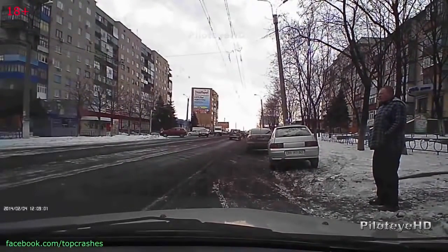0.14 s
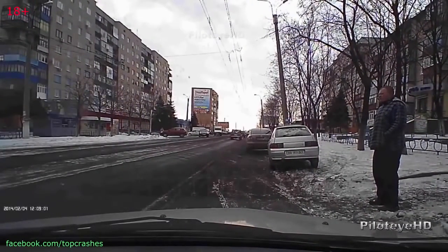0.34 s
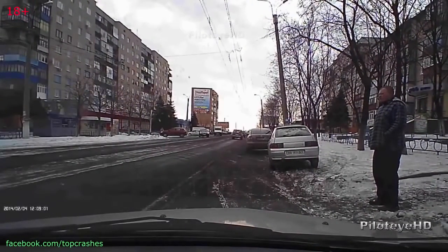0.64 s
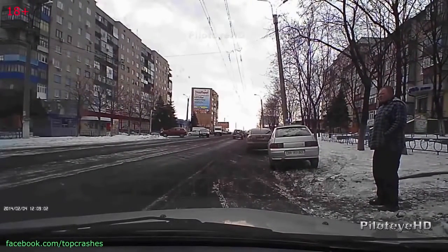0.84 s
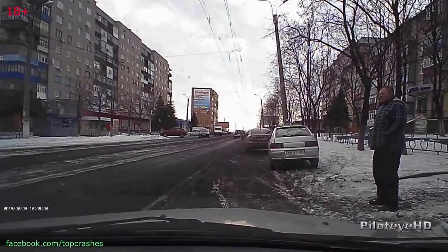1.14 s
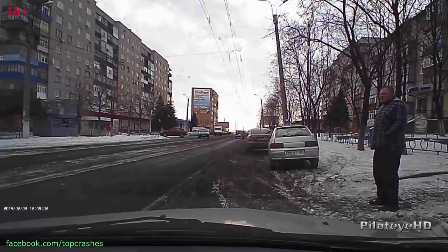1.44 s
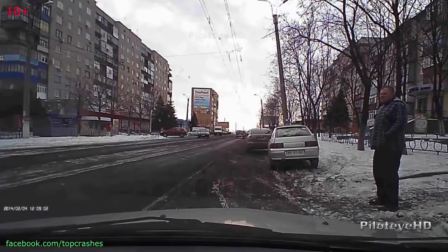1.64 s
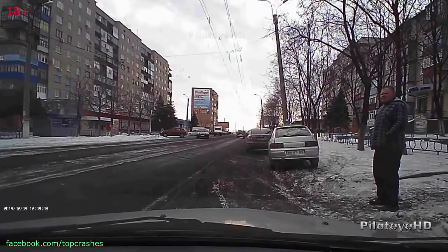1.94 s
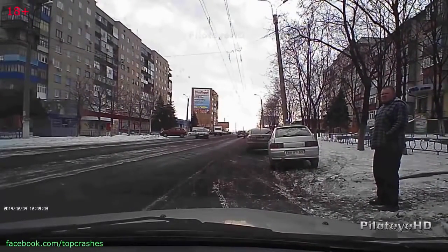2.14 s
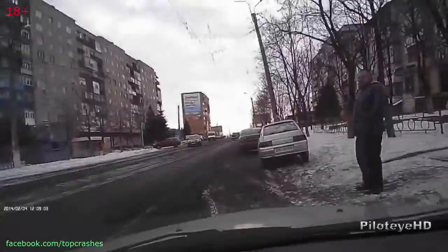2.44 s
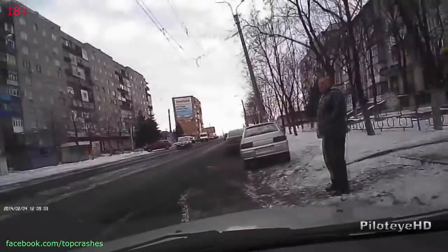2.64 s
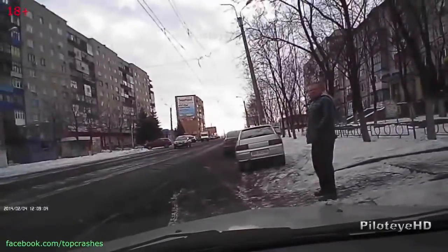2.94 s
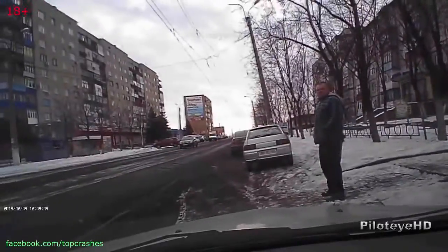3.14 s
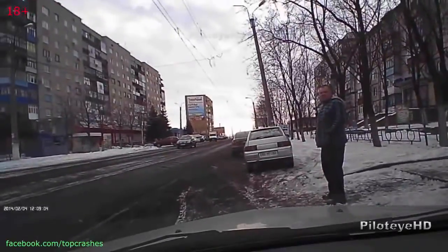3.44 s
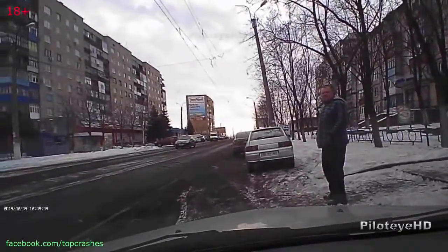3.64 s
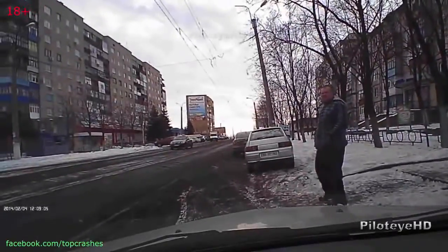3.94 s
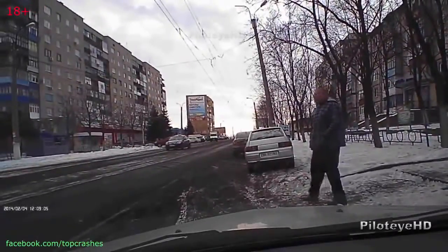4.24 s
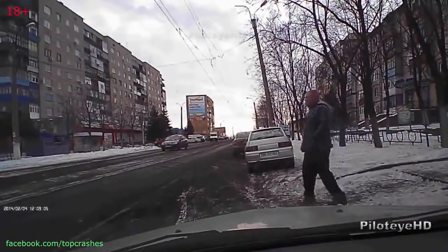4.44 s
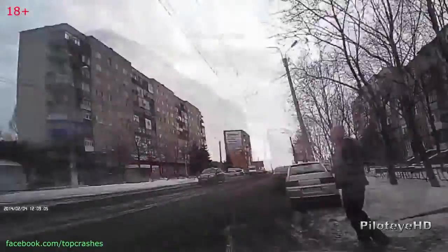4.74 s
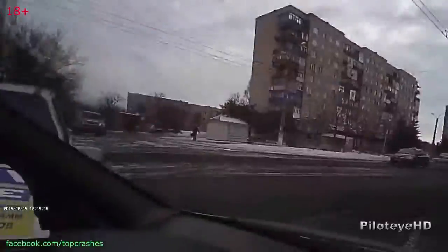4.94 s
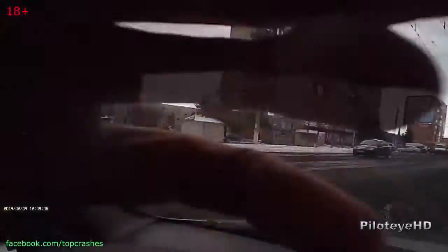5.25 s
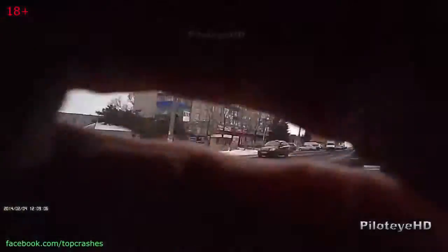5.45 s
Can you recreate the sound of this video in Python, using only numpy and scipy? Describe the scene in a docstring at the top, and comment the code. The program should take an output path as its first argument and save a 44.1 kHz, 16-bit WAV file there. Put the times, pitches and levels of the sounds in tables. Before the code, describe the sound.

The quiet, steady air of a car heater is broken by a heavy, distorted crunch as the car is hit. Sheet metal rips and crumples, and objects tumble against the floor and panels of the padded cabin, with gritty crackle and a fading rumble. The fan carries on underneath. Then comes close handling noise right on the camera microphone: a flurry of dry plastic snaps, followed by scraping fingers and a few last clicks.

```python
"""A heater fan rushes in a parked car, then a crash from behind overloads a small windscreen camera's mic.
Bumpers thump, sheet metal tears and crumples in bursts of tiny impacts, and the idling engine dies.
The body rocks on its springs while loose things tumble and knock, ringing the floor and panels.
Then a hand takes hold of the camera: its plastic mount slips and clicks, fingers rub and creak the case."""
import sys
import numpy as np
from scipy import signal
from scipy.io import wavfile
from scipy.ndimage import uniform_filter1d

SR = 44100
rng = np.random.default_rng(int(sys.argv[2]) if len(sys.argv) > 2 else 0)


def bounce(signal):
    """Save signal as a 16-bit WAV file at the path given by the first command-line argument."""
    frames = np.transpose(np.atleast_2d(signal))
    limited = np.clip(frames, -1, 1)
    pcm = np.round(limited * 32767).astype(np.int16)
    wavfile.write(sys.argv[1], SR, pcm)


N = 246519

# spectrum of scattering grit and splinters: f/Hz, relative level/dB
GRIT_SPECTRUM = [(1180, -9), (2000, -0.5), (2690, -2), (3120, -12), (3710, -6.5), (4610, -20), (7060, -20),
                 (8550, -31), (14800, -37.5), (16000, -53.5)]


def amp(db):
    return 10 ** (np.asarray(db) / 20)


def unit_rms(x):
    return x / np.sqrt(np.mean(x ** 2) + 1e-20)


def spectrum_db(points, hz):
    f, db = np.transpose(points)
    return np.interp(np.log(hz + 1), np.log(f + 1), db)


def add(mix, s, sound):
    part = mix[round(s * SR):][:len(sound)]
    part += sound[:len(part)]


def fader(rows, offset_db=0, depth=1):
    """Gain over time from a dB curve scaled by depth, silent outside the curve."""
    s, db = np.transpose(rows)
    return amp(np.interp(np.arange(N) / SR, s, offset_db + depth * db, left=-200, right=-200))


def swell(s, hold, db, rise, fall):
    """Gain that climbs 30 dB in rise seconds up to s, holds, and sinks 30 dB every fall seconds."""
    t = np.arange(N) / SR - s
    return amp(db + 30 * np.minimum(np.minimum(t / rise, 0), (hold - t) / fall)) * (t > -rise)


def colour(x, points):
    """Minimum-phase EQ of unit energy through (f/Hz, relative level/dB) points."""
    log_gain = spectrum_db(points, abs(np.fft.fftfreq(8192, 1 / SR))) * np.log(10) / 20
    taps = np.fft.ifft(np.exp(np.conj(signal.hilbert(log_gain)))).real[:4096]
    return signal.oaconvolve(x, taps / np.linalg.norm(taps))[:N]


def grains(per_s, spread_db):
    """A crackle of random tiny impacts at unit power; a few are large."""
    size = amp(spread_db * np.minimum(rng.exponential(1, N), 5)) * rng.standard_normal(N)
    return unit_rms(size * (rng.random(N) < per_s / SR))


def ring(modes, scatter, rise, pitch=1, decay=1):
    """A struck object, peak 1: scatter varies each mode's level and tuning; rise is the contact time/s."""
    hz, db, t60 = np.transpose(modes)[:, :, None]
    t = np.arange(6000) / SR
    scatter = scatter[:len(modes), None]
    envelopes = amp(db + 2.0 * scatter - 60 * t / (t60 * decay))
    tuned_hz = hz * pitch * (1 + 0.033 * scatter)
    sound = (envelopes * np.sin(2 * np.pi * tuned_hz * t)).sum(0)
    sound *= 1 - np.exp(-(t / rise) ** 2)
    return sound / abs(sound).max()


def cabin(x):
    """The padded cabin answers with a short, dull reverb."""
    t = np.arange(8000) / SR
    tail = rng.standard_normal(len(t)) * amp(-60 * t / 0.1) * (t > .002)
    tail = signal.lfilter([1], [1, -.6], tail)
    return signal.oaconvolve(x, tail / np.linalg.norm(tail))[:N]


def heater_fan():
    """A bed of air rushing through resonant ducts, its colour and level drifting slightly."""
    # spectrum of the airflow: f/Hz, relative level/dB
    air = [(12, -30), (22, -9), (40, -13), (120, -10), (160, -15), (215, -3), (900, -6), (1030, -16),
           (1620, -17), (1800, -23), (2800, -33), (4500, -44), (8500, -49), (12000, -51), (16000, -46)]
    # duct and cabin peaks and dips: f/Hz, width/Hz, gain/dB
    ducts = [(267, 6, -2), (363, 95, 7.5), (442, 400, -6.5), (570, 54, 4), (708, 60, -8), (762, 35, 6.5),
             (1234, 59, 1), (1473, 75, -0.5), (3730, 86, 6)]
    frames, hz = N // 512 + 5, np.fft.rfftfreq(2048, 1 / SR)
    real, imag, patches = rng.standard_normal((frames, 1025, 3)).T
    patches = unit_rms(uniform_filter1d(uniform_filter1d(patches, 12, 0), 6, 1))
    drift = unit_rms(uniform_filter1d(rng.standard_normal(frames), 8))
    ducts_db = sum(db / (1 + ((hz - f) / (width / 2)) ** 2) for f, width, db in ducts)
    rush_db = (spectrum_db(air, hz) + ducts_db)[:, None] + 1.4 * patches + .4 * drift
    _, rush = signal.istft((real + 1j * imag) * amp(rush_db), nperseg=2048, noverlap=1536)
    return amp(-43) * unit_rms(rush[:N])


def whine():
    """A thin steady whine; rapid polarity flips give it a comb of side tones."""
    whine_hz, flips_per_s = 7867.5, 59
    t = np.arange(N) / SR
    flip = np.tanh(8 * np.sin(np.pi * flips_per_s * t))  # nearly square, so the comb is wide
    return np.sqrt(2) * amp(-73.5) * flip * np.sin(2 * np.pi * whine_hz * t)


def engine():
    """The low firing tone of the idling engine, which dies in the blow."""
    firing_hz, stall_s = 28, 2.4
    t = np.arange(N) / SR
    return np.sqrt(2) * amp(-61) * np.sin(2 * np.pi * (firing_hz * t + rng.random())) * (t < stall_s)


def fingers():
    """Skin sticks and slips: dense tugs sound through the case; lighter slips hiss and ring its shell."""
    # finger strokes: t/s, hold/s, tug level/dB, rise/s, hiss level/dB
    strokes = [(4.649, 0.041, -33, .015, -47.5), (4.745, .003, -23, 0.038, -42.5),
               (4.886, 0.032, -48, 0.074, -71), (5.099, .004, -30.5, 0.05, -47.5),
               (5.281, 0.042, -39, 0.17, -54), (5.363, 0.033, -36, 0.028, -49.5),
               (5.428, 0.099, -49, .05, -64.5), (5.558, 0.055, -43.5, .1, -61)]
    # spectrum of rubbing through the case: f/Hz, relative level/dB
    rub = [(120, -24), (200, -4.5), (400, 0.5), (500, -5), (620, 2.5), (850, -2.5), (1100, 1), (1450, -5),
           (1800, -6), (2150, -8.5), (2550, -14), (3200, -36), (5000, -55)]
    # spectrum of skin hiss: f/Hz, relative level/dB
    skin = [(1650, -42), (2800, 4), (3260, -7.5), (4060, -2.5), (4600, -9), (6820, -7.5), (14200, -25),
            (16000, -40)]
    # shell modes under the fingers: f/Hz, relative level/dB, t60/s
    shell_modes = [(1260, 2, 0.025), (1850, 0, .025), (2080, 0, 0.024), (2600, -4, 0.017),
                   (3745, -10.5, 0.028), (6800, -11, 0.013)]
    fall_s = 0.056
    tug = sum(swell(s, hold, db, rise, fall_s) for s, hold, db, rise, _ in strokes)
    hiss = sum(swell(s, hold, db, rise, fall_s) for s, hold, _, rise, db in strokes)
    shell = ring(shell_modes, np.zeros(len(shell_modes)), rise=0.00052)
    creak = amp(4.5) * signal.oaconvolve(hiss * grains(980, 3.5), shell / np.linalg.norm(shell))[:N]
    return colour(tug * grains(4000, 1.2), rub) + colour(hiss * grains(12000, 1.6), skin) + creak


def mount():
    """Each slip of the mount snaps dryly, rings the case and thuds; the grip jolts the glass."""
    # slips: t/s, case level/dB, snap level/dB, sizzle against the snap/dB, thud level/dB
    clicks = [(4.6028, -30.5, -43, -14, -30.5), (4.638, -29, -44, -10, -33.5), (4.65, -14, -29, -4.5, -44),
              (4.6569, -17.5, -28, -7, -38), (4.66, -13, -36, -10, -40), (4.666, -17.5, -42, -11, -33),
              (4.6793, -26, -47, -5, -30), (4.6853, -26, -19.5, -4.5, -35), (4.6936, -23.5, -32, -7, -30),
              (4.7093, -24, -37, 0, -44), (4.7227, -24, -30, -4, -48), (4.7395, -15.5, -21, -11, -44),
              (4.745, -19.5, -46, -5, -18), (4.7549, -24, -43, -11, -38), (4.7721, -10, -11, -8.5, -35),
              (4.7823, -40, -47, 6, -39), (4.7897, -23.5, -41, -6, -39), (4.8089, -32, -33, -8, -41),
              (4.8127, -34, -37, -2, -49), (4.8204, -41, -43, -2, -35), (4.8291, -19, -28.5, -5, -35),
              (4.8494, -32, -33, -2, -41), (4.8521, -26, -25.5, -12, -31), (4.8557, -20, -23.5, 1.5, -49),
              (4.8645, -23.5, -19, -8.5, -48), (4.8713, -24.5, -41, -2, -44),
              (4.8782, -18.5, -24.5, -13, -40), (4.8966, -32, -49, -2, -49), (4.9144, -28, -50, 3, -35),
              (4.9535, -25.5, -27.5, -21, -43), (5.0732, -27.5, -50, -6, -33), (5.0948, -35, -38, -5, -37),
              (5.0989, -16, -27, -5, -49), (5.102, -33, -26.5, -4.5, -27), (5.1047, -18.5, -19, -14, -25.5),
              (5.1227, -33, -57, -12, -35), (5.2458, -31, -50, -9, -33), (5.395, -28.5, -39, -7, -53),
              (5.452, -48, -38.5, 6.5, -57), (5.5407, -32.5, -34, -22, -51)]
    # case modes, before pitch and decay scale them: f/Hz, relative level/dB, t60/s
    case = [(1014, 0.5, 0.016), (1248, 9, 0.013), (1465, 4, 0.018), (1710, -11, 0.011), (2360, -5, 0.0065),
            (2630, 8, 0.0075)]
    # thud through the glass: multiple of its pitch, relative level/dB, t60/s
    thud = [(.5, -11, 0.031), (1.0, 17, 0.032)]
    # spectrum of the snap's mids: f/Hz, relative level/dB
    snap_mids = [(1200, -38), (1900, 10), (2700, -6.5), (3780, 5.5), (4600, -3), (6700, -5.5), (8500, -54)]
    # spectrum of the sizzle on top: f/Hz, relative level/dB
    snap_highs = [(5500, -23), (7000, 3), (9000, -0.5), (12000, -7), (16000, -5.5)]
    # modes of a small hard part of the mount: f/Hz, relative level/dB, t60/s
    ping_modes = [(3070, -3, 0.043), (3680, 12, 0.024), (3780, -7, 0.078), (3860, -16, .07),
                  (5100, -20, .04), (5100, -19, .04)]
    # strikes on that part: t/s, peak level/dB
    pings = [(5.074, -55), (5.0995, -45), (5.104, -22), (5.361, -58)]
    body, snaps, sizzle = np.zeros((3, N))
    t = np.arange(400) / SR
    for s, case_db, snap_db, sizzle_db, thud_db in clicks:
        noise = rng.standard_normal(len(t))
        softness = np.clip((case_db - snap_db) / 20, 0, 1)  # soft slips: little snap, slow attack
        contact_s = 0.00048 + 0.0028 * softness
        add(body, s, amp(case_db) * ring(case, noise, contact_s, pitch=0.922, decay=0.73))
        thud_hz = 425 * np.exp(0.1 * noise[8])
        add(body, s, amp(thud_db) * ring(thud, noise[6:], rise=0.00092, pitch=thud_hz))
        snap = amp(snap_db - 60 * t / 0.0064) * np.sign(noise)
        add(snaps, s, snap)
        add(sizzle, s, amp(sizzle_db) * snap)
    for s, db in pings:
        add(body, s, amp(db) * ring(ping_modes, np.zeros(len(ping_modes)), rise=0.00023))
    rumble = colour(rng.standard_normal(N), [(15, -6), (40, 3), (150, 11), (250, -37)])
    jolt = swell(4.68, hold=0, db=-31, rise=0.15, fall=0.06) * rumble
    return body + colour(snaps, snap_mids) + colour(sizzle, snap_highs) + jolt


def knocks():
    """Loose things tumble: each hit rings floor, panels and small parts and shakes up a puff of grit."""
    # hits: t/s, panel peak level/dB, hardness/dB (small and hard high, heavy and soft low)
    hits = [(2.494, -13, -4.5), (2.514, -18, -15), (2.548, -9, -4), (2.568, -7.5, -11.5), (2.594, -23.5, 2),
            (2.629, -13.5, -3), (2.677, -27.5, 4), (2.698, -17, -1), (2.718, -18, 3), (2.74, -20, 0),
            (2.807, -20, 4.5), (2.832, -14, -3), (2.907, -22, 4.5), (2.943, -27, 10.5), (3.088, -22.5, 6.5),
            (3.133, -17, -4), (3.146, -31.5, 15.5), (3.178, -41, 5), (3.292, -17, -8), (3.309, -34, 1),
            (3.361, -21.5, -13.5), (3.412, -19.5, -11.5), (3.471, -29, 3), (3.509, -29, 7.5),
            (3.544, -29, -0.5), (3.569, -27, 2.5), (3.638, -28.5, 4), (3.667, -34.5, 8.5),
            (3.748, -33, 0.5), (3.887, -45, -12)]
    # boom of floor and seats: f/Hz, relative level/dB, t60/s before decay scales it
    boom = [(95, -1.5, 0.042), (136.6, -1, 0.061), (197, -2.5, 0.077)]
    # door and dash panel modes: f/Hz, relative level/dB, t60/s before decay scales it
    panels = [(272, 3.5, 0.095), (331, -2.5, 0.1), (493, 2, 0.081), (571.5, -2, 0.093), (662, -5.5, 0.072),
              (724, 3.5, 0.054), (848, 0, 0.092), (952, -1.5, 0.071)]
    # clack of small hard parts: f/Hz, relative level/dB, t60/s before decay scales it
    clack = [(1155, 1.5, 0.032), (1277, 5, 0.044), (1432, -2.5, 0.051), (1574, 0, 0.048),
             (1963, -8.5, 0.05), (2300, 0, 0.023)]
    body, puffs = np.zeros((2, N))
    t, decay = np.arange(1500) / SR, 0.73
    for s, db, hardness in hits:
        noise = rng.standard_normal(len(t))
        add(body, s, amp(db - 8.5 - 0.71 * hardness) * ring(boom, noise, rise=0.0028, decay=decay))
        add(body, s, amp(db) * ring(panels, noise[3:], rise=0.0011, decay=decay))
        add(body, s, amp(db - 3.5 + 0.62 * hardness) * ring(clack, noise[11:], rise=0.004, decay=decay))
        puff = noise * amp(-60 * t / 0.08) * (1 - np.exp(-t / 0.0015))
        add(puffs, s, amp(db - 15.5 + hardness) * puff)
    return body + colour(puffs, GRIT_SPECTRUM)


def wreck():
    """The crash's tail: metal folds, the body rocks on its springs and grit follows the crumpling."""
    # crumpling as the wreck settles: t/s, level/dB
    settling = [(2.44, -22), (2.455, -4), (2.49, -20), (2.52, -21), (2.54, -25), (2.56, -20), (2.61, -25),
                (2.72, -23), (2.78, -27.5), (2.84, -21.5), (2.87, -28.5), (3.0, -32.5), (3.16, -35),
                (3.28, -44.5), (3.68, -40), (3.88, -60)]
    # spectrum of folding metal: f/Hz, relative level/dB
    metal = [(71, -18), (120, -12), (325, 0), (362, 0), (393, 3.5), (588, -5), (729, -0.5), (1090, -7.5),
             (1340, -4.5), (1820, -15), (3000, -29), (3900, -54), (6600, -120)]
    # spectrum of the rocking body: f/Hz, relative level/dB
    rumble = [(8.8, -30.5), (25, 2), (46, 6.5), (92, -5.5), (149, -1.5), (180, -9), (230, -25), (400, -120)]
    crumple = colour(fader(settling) * grains(2500, 1.3), metal)
    rock = swell(2.452, hold=0, db=-20.5, rise=.02, fall=1.18) * colour(rng.standard_normal(N), rumble)
    grit = colour(fader(settling, offset_db=-11.5, depth=0.99) * grains(5000, 1.5), GRIT_SPECTRUM)
    return crumple + rock + grit


def blow():
    """Bumpers meet with a short thump; a low crush holds and lets go while sheet metal shrieks."""
    # spectrum of the crush: f/Hz, relative level/dB
    crush = [(20, -38), (60, -2.5), (140, -1), (300, -1), (600, -7.5), (1000, -8.5), (3000, -38),
             (16000, -70)]
    # rips in the sheet metal: t/s, level/dB
    tears = [(2.393, -12), (2.405, 1), (2.417, -7), (2.429, -4), (2.449, 3.5), (2.467, -10)]
    # spectrum of tearing metal: f/Hz, relative level/dB
    shriek = [(500, -32.5), (1000, -4.5), (1350, 10.5), (1700, -3.5), (2130, 4), (3000, -20), (3940, -16.5),
              (7000, -31), (16000, -35)]
    force = swell(2.402, hold=0.069, db=-2, rise=0.0091, fall=0.006)
    tearing = sum(swell(s, hold=0, db=db, rise=.008, fall=.02) for s, db in tears)
    impact = colour(force * grains(6000, 2.4), crush) + colour(tearing * grains(3600, 4.0), shriek)
    thump_s, thump_hz, thump_t60 = 2.3868, 235, .035
    t = np.arange(3000) / SR
    envelope = amp(-2.0 - 60 * t / thump_t60) * (1 - np.exp(-t / 0.0012))
    add(impact, thump_s, envelope * np.sin(2 * np.pi * thump_hz * t))
    return impact


def scene():
    """Mono mix of bed, crash and handling; only the knocks and the mount feed the cabin reverb."""
    tumble, clicks = knocks(), mount()
    bed = heater_fan() + whine() + engine()
    reverb = cabin(amp(-8.0) * tumble + amp(-21.0) * clicks)
    return (bed + blow() + wreck() + tumble + fingers() + clicks + reverb)[None]


def record(dry):
    """The preamp overloads lopsidedly, its coupling capacitor lets flat tops drift, the highs roll off."""
    top, bottom, knee = .37, -.66, 2.8
    sag, sag_s = .6, .03  # the lower limit gives way under sustained overload
    coupling_hz, dull_hz, edge_hz = 4.0, 13500, 16500
    pole = np.exp(-1 / (sag_s * SR))
    overloaded = 1.0 * ((dry > top) | (dry < bottom))
    strain = signal.lfilter([1 - pole], [1, -pole], overloaded)
    limit = np.where(dry > 0, top, bottom * (1 - sag * strain))
    clipped = dry / (1 + (dry / limit) ** knee) ** (1 / knee)
    coupled = signal.lfilter([1, -1], [1, -np.exp(-2 * np.pi * coupling_hz / SR)], clipped)
    dulled = signal.lfilter(*signal.butter(3, dull_hz, fs=SR), coupled)
    band_limit = signal.firwin(511, edge_hz, window=("kaiser", 9), fs=SR)
    return signal.oaconvolve(dulled, band_limit[None], "same")


dry = scene()
out = record(dry)
bounce(out)
```